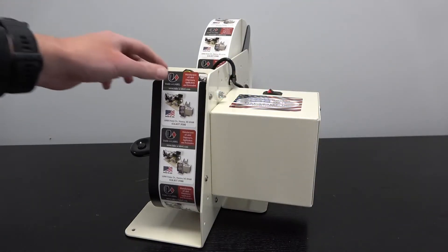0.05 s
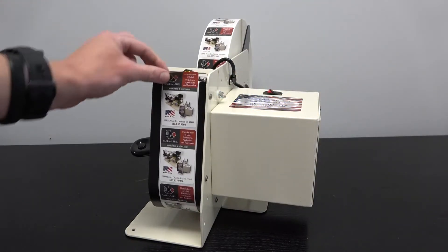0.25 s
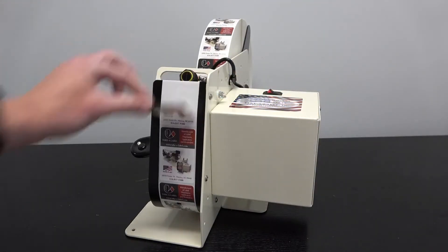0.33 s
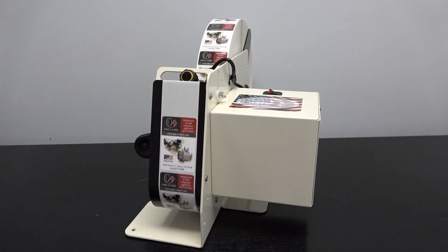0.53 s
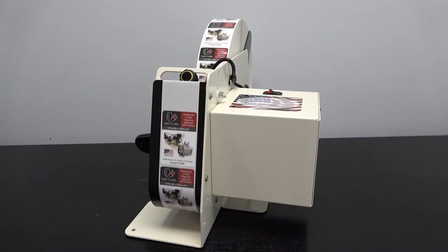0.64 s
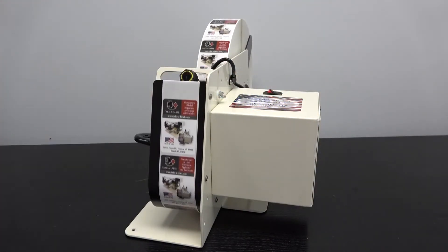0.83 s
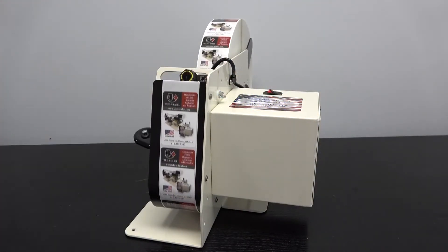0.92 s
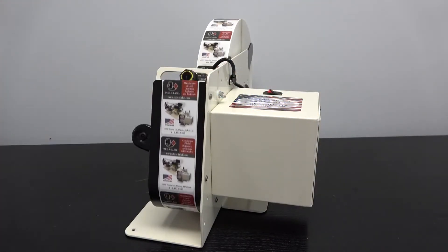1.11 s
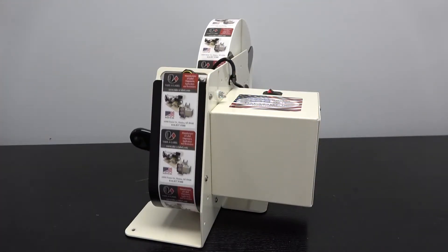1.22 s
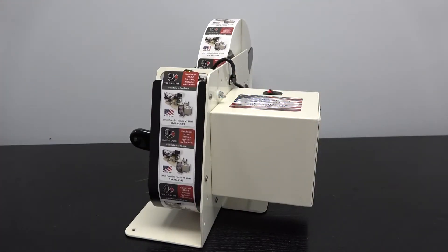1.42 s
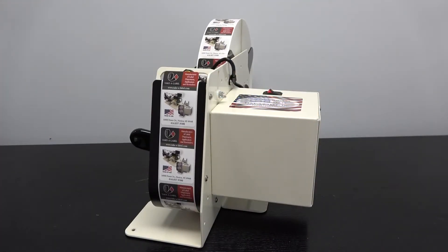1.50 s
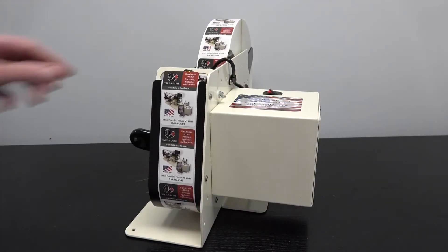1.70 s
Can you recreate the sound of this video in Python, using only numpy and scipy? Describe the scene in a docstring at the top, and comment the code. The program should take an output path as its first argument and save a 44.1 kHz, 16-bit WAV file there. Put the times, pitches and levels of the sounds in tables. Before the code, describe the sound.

A label dispenser clicks, whirs briefly as it feeds paper, and stops with a clack.

```python
"""A geared motor in a label dispenser whirs for a second, feeding one label, close by in a small room.
A label is plucked off with a swish and a snap, and the drive clicks in. Meshing teeth give tones and
excite the housing's resonances; reel and rollers moan; the paper strip hisses by friction and peels
in tiny fractures of glue. The drive stops with a ringing clack, and the strip settles in faint ticks."""
import sys
import numpy as np
from scipy import signal
from scipy.fft import rfft, irfft
from scipy.io import wavfile

SR = 44100
rng = np.random.default_rng(int(sys.argv[2]) if len(sys.argv) > 2 else 0)


def digitize_waveform(pressure):
    """Quantize a signal to 16-bit integers and store it at the path in sys.argv[1].

    Rows of a 2-D input are taken as channels; values are limited to [-1, 1].
    """
    field = np.atleast_2d(pressure).T
    bounded = np.clip(field, -1, 1)
    quanta = np.round(bounded * 32767).astype(np.int16)
    wavfile.write(sys.argv[1], SR, quanta)


N = 77175
T, HZ = np.arange(N) / SR, np.fft.rfftfreq(2 * N, 1 / SR)
START_S, STOP_S = .2, 1.177


def motor():
    """Forced vibration: gear tones, tooth clatter and a whine of steady pitch swell with the effort."""
    # Effort of the drive. Each row: time in seconds, gain in dB.
    effort = [(.2, -7), (.245, -10), (.285, -1), (.32, -1), (.38, 0), (.5, 0.5), (.62, 0.5), (.73, 0.5),
              (.85, 3), (.94, 1), (1.05, -1), (1.18, 1.5)]
    whine = amp(-53) * tone(2160, rough=.18) * running(.24, rise_s=.51, fall_db_per_s=100)
    vibration = gears() + clatter() + whine
    return vibration * amp(curve(effort)) * running(START_S, rise_s=.0023, fall_db_per_s=232)


def gears():
    """Periodic tooth contact gives tones whose frequencies are proportional to the motor's speed."""
    # Motor speed. Each row: time in seconds, mesh frequency in Hz.
    mesh_pitch = [(.2, 1003), (.26, 1560), (.31, 1725), (.355, 1802), (.395, 1838), (.44, 1811), (.5, 1847),
                  (.68, 1815), (.79, 1789), (.86, 1802), (.97, 1831), (1.08, 1839), (1.185, 1822),
                  (1.26, 1714)]
    # Gear tones. Each row: frequency at full speed in Hz, relative level in dB, roughness from 0 to 1.
    partials = [(838, -54.5, .5), (915, -52.5, .3), (974, -51.5, .2), (1045, -52, .45), (1093, -58, .4),
                (1266, -49.5, .35), (1346, -48, .35), (1534, -58, .6), (1642, -58, .6), (2840, -59, .6)]
    # Load on the gears, highest as they wind up. Each row: time in seconds, gain in dB.
    load = [(.2, -3), (.27, -5), (.34, 4), (.42, .5), (.5, 2.5), (.64, -1.5), (.85, -1), (1.0, -.5),
            (1.18, -3)]
    full_speed_hz, wobble = 1828, .00246
    speed = curve(mesh_pitch) / full_speed_hz * (1 + wobble * drift(25))
    train = sum(amp(db) * tone(hz * speed, rough) for hz, db, rough in partials)
    mesh = amp(-44.5) * tone(full_speed_hz * speed, rough=.15)
    return train * amp(curve(load)) + mesh * running(.31, rise_s=.09, fall_db_per_s=60)


def clatter():
    """Impact excitation: random knocks of the teeth ring the resonances of the housing."""
    # Spectrum of the knocks. Each row: frequency in Hz, relative density in dB.
    knock_colour = [(60, -55.5), (110, -14), (150, -7.5), (280, -7), (450, 2.5), (720, -5), (950, 4.5),
                    (1400, 1.5), (2050, 0), (2700, 3.5), (4000, -7), (6000, -6.5), (15000, -21)]
    # Resonances and antiresonances. Each row: centre in Hz, width in Hz, lift in dB.
    housing = [(152.4, 8.6, 11.5), (181.6, 17.6, 14), (234, 10, 14), (269, 9.4, -15.5), (356, 36, 6),
               (450, 28, 7), (627, 27, 8.5), (880, 106, 3), (1029, 74, 5.5), (1200, 31, 1.5), (1374, 97, 8),
               (1523, 19, 4), (1710, 40, 4), (1799, 88, 11), (2230, 24, -1), (2640, 65, 5.5),
               (2854, 23, 7.5), (3508, 135, 7.5)]
    housing_db = sum(db * np.exp(-((HZ - hz) / width) ** 2) for hz, width, db in housing)
    knocks = grains(per_s=1800, spread_db=1)
    return amp(-39) * unit(colour(knocks, spectrum(knock_colour) + housing_db))


def drive_start():
    """The drive engages in three quick impacts, and its modes ring freely."""
    # Impacts. Each row: start in seconds, level in dB, t60 in seconds.
    hits = [(.1987, -29, 0.05), (.2008, -31.5, .05), (.2058, -33, 0.057)]
    # Contact spectrum. Each row: frequency in Hz, relative density in dB.
    tint = [(100, -31.5), (350, -1.5), (600, -3), (950, 1), (1900, 1), (3200, -3.5), (5000, -3),
            (6400, -3.5), (7600, 5.5), (9500, -0.5), (11700, 3), (12400, -29), (16000, -3)]
    # Modes. Each row: frequency in Hz, level in dB, t60 in seconds.
    modes = [(375, -49, 0.53), (2283, -43.5, 0.27), (3725, -36, 0.077), (5950, -35, 0.04),
             (7620, -39, 0.076)]
    return clack(hits, tint, modes)


def drive_stop():
    """Impact and rebound: a metal part lands, bounces and rings as the drive stops."""
    # Impacts. Each row: start in seconds, level in dB, t60 in seconds.
    hits = [(1.1835, -25.5, 0.041), (1.187, -25.5, 0.028), (1.1915, -33.5, 0.093)]
    # Contact spectrum. Each row: frequency in Hz, relative density in dB.
    tint = [(120, -24.5), (400, -9.5), (750, -4.5), (1300, 2), (2400, 2.5), (3800, -0.5), (4700, 0),
            (5400, 3), (6600, -5.5), (7900, -6), (9000, -8), (11500, -12), (13100, -5), (14000, -16),
            (16000, -16)]
    # Modes. Each row: frequency in Hz, level in dB, t60 in seconds.
    modes = [(170, -60, 0.19), (565, -48, 0.29), (1040, -38.5, 0.18), (1350, -44.5, 0.24),
             (2180, -46, 0.12), (2471, -43.5, 0.34), (5210, -50, 0.38), (5200, -49, 0.28)]
    return clack(hits, tint, modes)


def slide():
    """Sliding friction: dense tiny contacts of paper on the guides merge into a hiss."""
    # Strength of the hiss. Each row: time in seconds, relative level in dB.
    levels = [(0.32, -54), (0.382, -44), (0.524, -49), (0.618, -47), (0.688, -49.5), (0.858, -42.5),
              (1.048, -50), (1.17, -51)]
    # Friction spectrum. Each row: frequency in Hz, relative density in dB.
    tint = [(1500, -37), (4000, 4.5), (6500, -0.5), (8500, 3), (10200, 8), (11500, 2), (15500, -6.5)]
    hiss = unit(colour(grains(per_s=9000, spread_db=2), spectrum(tint)))
    return hiss * amp(4.5 + curve(levels)) * running(START_S, rise_s=.013, fall_db_per_s=510)


def peel():
    """Adhesive fracture: glue lets go in tiny snaps, in a band that sinks and then partly recovers."""
    # Peeling band. Each row: time in seconds, centre in Hz, level in dB before the fades.
    path = [(.84, 8300, -65), (.888, 7300, -37.5), (.925, 6940, -43.5), (.962, 6800, -32), (1.0, 5970, -38),
            (1.05, 6302, -42), (1.13, 7014, -42.5), (1.18, 6800, -42)]
    hz, t, snaps = signal.stft(grains(per_s=2200, spread_db=-.5), SR, nperseg=256)
    octaves = np.log2((hz[:, None] + 1) / np.interp(t, T, curve(path)))
    band = np.exp(-(octaves / .21) ** 2)
    upper_skirt = amp(-9.5) * np.exp(-((octaves - .35) / .26) ** 2)
    crackle = unit(signal.istft(snaps * (band + upper_skirt), SR, nperseg=256)[1][:N])
    return crackle * amp(curve(path, column=2)) * running(.8, rise_s=.05, fall_db_per_s=820)


def paper_snaps():
    """Brief transients have broad spectra: the paper snaps, and ticks as it settles."""
    # Snaps and ticks. Each row: start in seconds, level in dB, t60 in seconds.
    snaps = [(.102, -63, 0.022), (.2885, -25.5, 0.023), (.2955, -48, 0.019), (1.436, -65.5, 0.12),
             (1.535, -60.5, 0.13)]
    # Their spectrum. Each row: frequency in Hz, relative density in dB.
    tint = [(500, -1), (3300, -6.5), (4700, -1), (5500, 0), (6400, 5.5), (8500, 0.5), (15500, -8)]
    return clicks(snaps, tint, rise_s=.00033)


def reel():
    """Amplitude modulation: each moan of reel and rollers swells and fades on one pitch."""
    # Each row: middle in seconds, length in seconds, frequency in Hz, peak level in dB.
    moans = [(.285, 0.18, 558, -52), (.335, 0.1, 945, -42.5), (0.485, 0.078, 872, -39.5),
             (0.545, 0.097, 435, -39), (0.694, 0.075, 437.3, -46.5), (0.847, 0.19, 474, -46),
             (0.893, 0.19, 320, -57.5), (0.98, 0.16, 368, -53), (1.044, 0.26, 151.4, -53.5),
             (1.12, 0.062, 466, -51.5)]
    sound = np.zeros(N)
    for middle, length, hz, db in moans:
        swell = np.cos(np.pi * np.clip((T - middle) / length, -.5, .5)) ** 1.23
        sound += amp(db) * tone(hz, rough=.1) * swell
    return sound


def swish():
    """Friction noise: the label slips under the fingers before it lifts."""
    # Strength of the slip. Each row: time in seconds, level in dB.
    levels = [(.12, -100), (.15, -72.5), (.185, -64.5), (.198, -56), (.205, -100)]
    # Friction spectrum. Each row: frequency in Hz, relative density in dB.
    tint = [(1500, -29.5), (4500, -6.5), (6000, -10), (7400, 1), (8600, -13), (15000, -11)]
    return unit(colour(rng.standard_normal(N), spectrum(tint))) * amp(curve(levels))


def rustle():
    """Shot noise: the slack strip crackles faintly as it is handled and as it settles."""
    # Strength of the crackle. Each row: time in seconds, level in dB.
    levels = [(0, -83), (.13, -104), (.19, -68), (.3, -58.5), (1.3, -65), (1.385, -64), (1.47, -70),
              (1.51, -64), (1.6, -72.5), (1.68, -76), (1.75, -93)]
    # Its spectrum. Each row: frequency in Hz, relative density in dB.
    tint = [(100, 0), (240, 10), (420, 3.5), (1200, 3.5), (2300, 4), (5000, -5.5), (9000, -11),
            (15500, -26)]
    return unit(colour(grains(per_s=2500, spread_db=4), spectrum(tint))) * amp(curve(levels))


def reverberation(x):
    """Convolution with a diffuse tail that decays exponentially and lasts longest in the bass."""
    # Reverberation time. Each row: frequency in Hz, t60 in seconds.
    t60 = [(150, 0.61), (1000, 0.28), (5000, 0.45), (8000, 0.3), (13000, 0.28)]
    hz, t, noise = signal.stft(rng.standard_normal(N), SR, nperseg=256)
    decay = np.exp(-np.log(1000) * t / spectrum(t60, hz)[:, None])
    tail = signal.istft(noise * decay, SR, nperseg=256)[1][:N]
    tail *= np.clip((T - .004) / .0021, 0, 1)  # reflections arrive after the direct sound
    return signal.fftconvolve(x, tail / np.linalg.norm(tail))[:N]


def ambience(machine):
    """The diffuse field from one direction: reverberation over steady room tone."""
    # Room tone. Each row: frequency in Hz, relative density in dB.
    tint = [(15, -9.5), (33, 0.5), (60, -4.5), (100, -13), (200, -19.5), (500, -20.5), (1200, -25),
            (3000, -35), (15000, -40)]
    room_tone = unit(shaped(rng.standard_normal(N), amp(spectrum(tint))))
    return amp(-11.5) * reverberation(machine) + amp(-69) * room_tone


def stereo(machine):
    """Mid-side stereo: phase and level differences place the machine; uncorrelated room sound widens it."""
    # Width of the direct sound and of the room. Each row: frequency in Hz, side gain in dB.
    direct_width = [(40, -21), (150, -15.5), (600, -19.5), (1300, -21.5), (3500, -49), (6000, -38),
                    (9500, -12), (13000, -40)]
    room_width = [(40, -18), (300, -14.5), (1000, -11.5), (3500, -41), (6000, -10.5), (10000, 0),
                  (13000, -26.5)]
    # Lean to the left. Each row: frequency in Hz, left over right in dB.
    balance = [(40, .7), (170, 2.5), (350, -.3), (650, 2.2), (1300, .4), (10000, 0)]
    mid = machine + ambience(machine)
    side = shaped(machine, 1j * amp(spectrum(direct_width)))  # a quarter cycle out of phase
    side += shaped(ambience(machine), amp(spectrum(room_width)))
    lean = amp(spectrum(balance) / 2)
    return np.array([shaped(mid, lean) + side, shaped(mid, 1 / lean) - side])


def clack(hits, tint, modes):
    """Modal ringing: contact noise plus damped sinusoids that start at the first impact."""
    start = hits[0][0]
    ring = sum(amp(db) * strike(start, t60, rise_s=.0014) * np.sin(2 * np.pi * (hz * T + rng.random()))
               for hz, db, t60 in modes)
    return clicks(hits, tint, rise_s=.00091) + ring


def clicks(hits, tint, rise_s):
    """Incoherent bursts of contact noise add in power."""
    power = sum((amp(db) * strike(start, t60, rise_s)) ** 2 for start, db, t60 in hits)
    return colour(np.sqrt(power) * rng.standard_normal(N), spectrum(tint))


def strike(start, t60, rise_s):
    """Damping: after a linear rise, a blow decays by 60 dB in t60 seconds."""
    age = np.maximum(T - start, 0)
    return np.minimum(age / rise_s, 1) * np.exp(-np.log(1000) * age / t60)


def running(start, rise_s, fall_db_per_s):
    """An envelope that rises, holds, and decays exponentially once the drive stops."""
    return np.clip((T - start) / rise_s, 0, 1) * amp(-fall_db_per_s * np.maximum(T - STOP_S, 0))


def tone(hz, rough, flutter_hz=14.7):
    """Random modulation makes a partial flutter in amplitude and phase."""
    scatter = (drift(flutter_hz) + 1j * drift(flutter_hz)) / np.sqrt(2)
    flutter = np.sqrt(1 - rough ** 2) + rough * scatter
    cycles = np.cumsum(hz * np.ones(N)) / SR + rng.random()
    return np.sqrt(2) * (flutter * np.exp(2j * np.pi * cycles)).real


def grains(per_s, spread_db):
    """A Poisson process of tiny impacts of uneven size, at rms 1."""
    impulses = (rng.random(N) < per_s / SR) * rng.choice([-1, 1], N)
    return unit(impulses * amp(spread_db * np.minimum(rng.exponential(1, N), 3)))


def drift(rate_hz):
    """Low-pass noise of rms 1."""
    return unit(shaped(rng.standard_normal(N), np.exp(-(HZ / rate_hz) ** 2)))


def colour(x, db):
    """A minimum-phase filter of unit power, so that resonances ring after their cause."""
    cepstrum = irfft(np.log(unit(amp(db))))
    cepstrum[1:N] *= 2
    cepstrum[N + 1:] = 0
    return shaped(x, np.exp(rfft(cepstrum)))


def shaped(x, gain):
    """Linear filtering by a gain for each frequency."""
    return irfft(rfft(x, 2 * N) * gain)[:N]


def spectrum(points, hz=HZ):
    """Interpolation on a log-frequency axis."""
    point_hz, value = np.transpose(points)
    return np.interp(np.log(hz + 1), np.log(point_hz + 1), value)


def curve(rows, column=1):
    """One column of a time table, interpolated at every sample."""
    rows = np.array(rows)
    return np.interp(T, rows[:, 0], rows[:, column])


def amp(db):
    """Decibels to gain."""
    return 10 ** (np.asarray(db) / 20)


def unit(x):
    """Normalisation to rms 1."""
    return x / np.sqrt(np.mean(abs(x) ** 2) + 1e-20)


def scene():
    """Superposition of drive and paper in the room; the moans stay dry and central."""
    drive = motor() + drive_start() + drive_stop()
    paper = slide() + peel() + paper_snaps() + swish() + rustle()
    return stereo(drive + paper) + reel()


def record(dry):
    """Band limiting: a linear-phase low-pass removes the highest treble."""
    cutoff_hz = 15950
    lowpass = signal.firwin(511, cutoff_hz, window=("kaiser", 9), fs=SR)
    return signal.oaconvolve(dry, lowpass[None], "same")


dry = scene()
out = record(dry)
digitize_waveform(out)
```